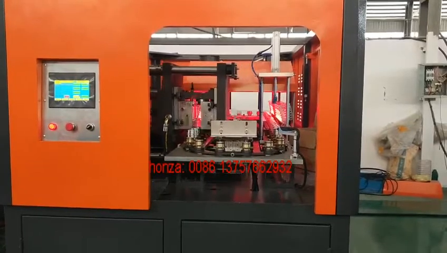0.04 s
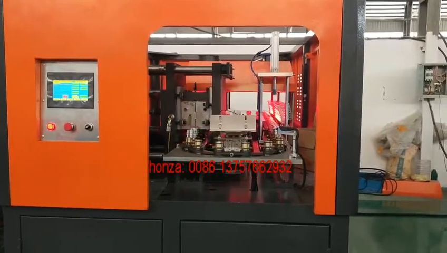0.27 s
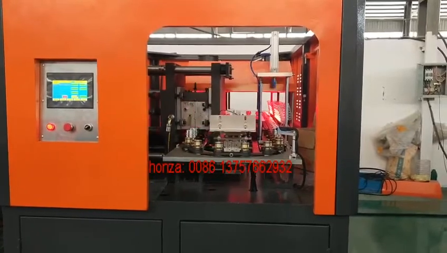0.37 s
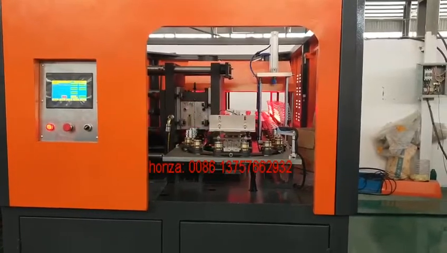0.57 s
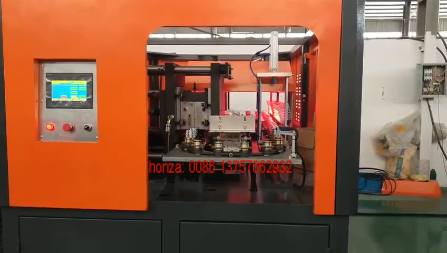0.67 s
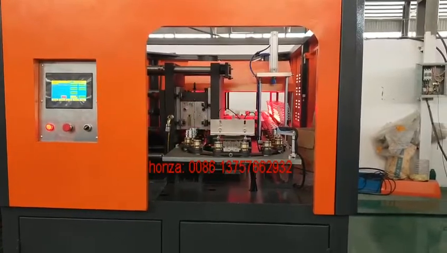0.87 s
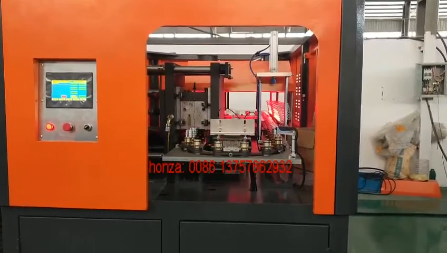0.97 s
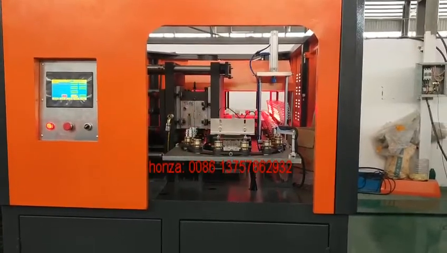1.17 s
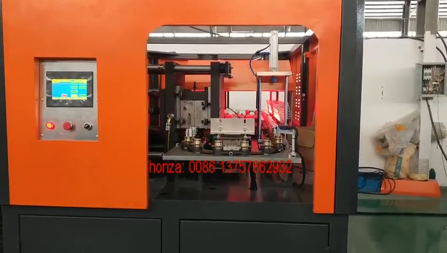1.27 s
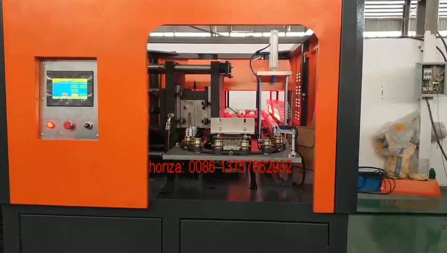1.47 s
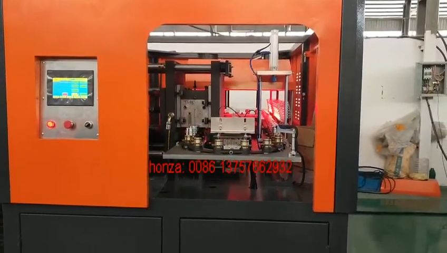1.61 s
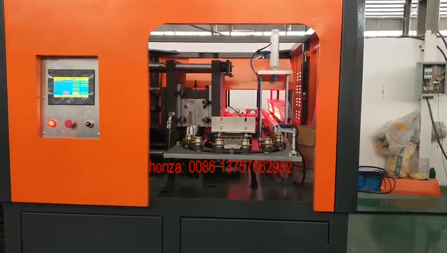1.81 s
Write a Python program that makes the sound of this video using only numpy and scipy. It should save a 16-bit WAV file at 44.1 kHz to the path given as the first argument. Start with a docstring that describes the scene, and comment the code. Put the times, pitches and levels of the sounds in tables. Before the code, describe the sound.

A bottle moulding machine vents overlapping bursts of compressed air while its carriage rumbles; the mould shuts with a boomy thump, then a loud bouncing steel clunk rings out. Humming workshop, close stereo microphone before the open cabinet.

```python
"""A bottle blow-moulding machine goes through one stroke, heard at two microphone ports before its open cabinet.
The workshop hums and roars throughout, as filtered noise and wavering sines. Air valves already hiss at the
start, in overlapping bursts of noise, and the carriage rumbles, strongest near 0.3 s. The mould shuts near
0.49 s: a noise thump and booming panel modes. Low noise puffs of draught begin near 0.8 s; at 0.95 s a cylinder
hits its steel stop and bounces, cracks of noise over damped modes, and the clunk and hiss die away in the hall."""
import sys
import numpy as np
from scipy import signal
from scipy.fft import rfft, irfft
from scipy.io import wavfile
from scipy.ndimage import uniform_filter1d

SR = 44100
rng = np.random.default_rng(int(sys.argv[2]) if len(sys.argv) > 2 else 0)


def log_audio(samples):
    """Write samples as a 16-bit WAV file to the path given in sys.argv[1]."""
    # one column per channel
    frames = np.atleast_2d(samples).T
    # limit to full scale, then quantise
    limited = np.clip(frames, -1, 1)
    pcm = np.round(limited * 32767).astype(np.int16)
    wavfile.write(sys.argv[1], SR, pcm)


N = 81585  # length in samples, 1.85 s


def amp(db):
    """Decibels to gain."""
    return 10 ** (np.asarray(db) / 20)


def times():
    """The time of each sample, in seconds."""
    return np.arange(N) / SR


def colour(points, tilt_db=0):
    """Gain per frequency bin from (freq_hz, gain_db) points, tilted in dB per octave above 128 Hz."""
    octave = np.log2(np.maximum(np.arange(N // 2 + 1) * SR / N, 1))
    freq_hz, gain_db = np.array(points).T
    curve_db = np.interp(octave, np.log2(freq_hz), gain_db)
    return amp(curve_db + tilt_db * np.maximum(octave, np.log2(128)))


PORT_SPACING_M, PORT_MISMATCH = 0.13, 0.084  # mismatch: share of likeness lost even in the bass


def diffuse(points, tilt_db=0):
    """Coloured stereo noise of rms 1 from all sides: the ports hear nearly the same only in the bass."""
    freq_hz = np.arange(N // 2 + 1) * SR / N
    # a diffuse field's likeness falls as a sinc of spacing over wavelength (343 m/s)
    alike = (1 - PORT_MISMATCH) * np.sinc(2 * freq_hz * PORT_SPACING_M / 343)
    mid, side = rfft(rng.standard_normal((2, N)))
    mid = mid * np.sqrt(1 + alike)
    side = side * np.sqrt(1 - alike)
    noise = irfft(np.array([mid + side, mid - side]) * colour(points, tilt_db), N)
    return noise / noise.std()


def walk(rate_hz):
    """Smooth random drift with a spread of 1: white noise averaged twice over 1 / rate_hz."""
    size = max(int(SR / rate_hz), 1)
    drift = rng.standard_normal(N)
    for _ in range(2):
        drift = uniform_filter1d(drift, size, mode="wrap")
    return drift / drift.std()


def envelope(start_s, rise_s, hold_s, t60_s):
    """Linear rise, hold, then an exponential fall of 60 dB per t60_s."""
    age = times() - start_s
    rise = np.clip(age / max(rise_s, 1 / SR), 0, 1)
    return rise * np.exp(-np.log(1000) * np.maximum(age - rise_s - hold_s, 0) / t60_s)


def ring(start_s, modes, rise_s):
    """Damped sine modes set going by one blow."""
    age = times() - start_s
    return sum(amp(level_db) * envelope(start_s, rise_s, 0, t60_s) * np.sin(2 * np.pi * pitch_hz * age)
               for pitch_hz, level_db, t60_s in modes)


def reverb(dry_sound, t60_s, points):
    """Dense reflections as decaying coloured noise, scaled to unit mean energy per port."""
    response = envelope(0, 0.0013, 0, t60_s) * diffuse(points)
    response = response / np.sqrt(np.sum(response ** 2) / 2)
    return signal.fftconvolve(dry_sound, response, axes=1)[:, :N]


# colour of the workshop roar: freq_hz, gain_db
ROAR_COLOUR = [(15, -14.5), (35, 9.5), (60, 3.5), (130, -5), (240, -0.5), (320, -2.5), (385, -4.5),
               (450, -8.5), (700, -13.5), (1000, -14), (1220, -20), (1450, -13.5), (2300, -10), (4000, -14),
               (5800, -13), (8000, -19.5), (16000, -35.5)]
# humming lines of the workshop: pitch_hz (centre), level_db (rms)
HUM_LINES = [(199, -58.5), (298, -59), (381, -52.5), (673, -63)]
ROAR_DB, ROAR_FADE_DB_PER_S = -39.5, 3.5  # level at mid-scene, and how fast it eases
HUM_WANDER, HUM_WANDER_HZ = 0.0094, 15.2  # pitch spread as a fraction, and its averaging rate


def workshop():
    """Fans and motors: a broadband roar that eases steadily, with a few lines of wavering pitch."""
    hum = 0
    for pitch_hz, level_db in HUM_LINES:
        wavering_hz = pitch_hz * (1 + HUM_WANDER * walk(HUM_WANDER_HZ))
        hum = hum + amp(level_db) * np.sqrt(2) * np.sin(2 * np.pi * np.cumsum(wavering_hz) / SR)
    roar_db = ROAR_DB - ROAR_FADE_DB_PER_S * (times() - times().mean())
    return hum + amp(roar_db) * diffuse(ROAR_COLOUR)


# puffs of air over the ports: start_s, length_s, level_db (louder port), left_minus_right_db
DRAUGHT_PUFFS = [(0.804, 0.071, -22, -33), (0.89, 0.042, -18.5, -27), (1.002, 0.17, -30, -13),
                 (1.588, 0.094, -34, 16), (1.779, 0.079, -34, -21.5)]
# colour of the puffs: freq_hz, gain_db
DRAUGHT_COLOUR = [(12, -2.5), (28, 5), (60, -9), (140, -9.5), (260, -17.5), (600, -28), (3000, -70)]


def draughts():
    """Moving air brushes the ports: soft low noise puffs, each mostly on one side."""
    puffs = 0
    for start_s, length_s, level_db, left_minus_right_db in DRAUGHT_PUFFS:
        swell = np.sin(np.pi * np.clip((times() - start_s) / length_s, 0, 1))
        # only the quieter port is turned down
        port_db = level_db + np.minimum([[left_minus_right_db], [-left_minus_right_db]], 0)
        puffs = puffs + amp(port_db) * swell * diffuse(DRAUGHT_COLOUR)
    return puffs


# loudness of the moving carriage: time_s, level_db
CARRIAGE_LEVEL = [(0, -49), (.07, -44.5), (.12, -54.5), (.195, -42), (.235, -36), (.293, -29), (.33, -37),
                  (.39, -35.5), (.47, -33), (.62, -37), (.72, -43.5), (.85, -38.5), (1.0, -41.5),
                  (1.2, -52)]
# colour of its rumble: freq_hz, gain_db
RUMBLE_COLOUR = [(20, -21), (55, -0.5), (120, -2.5), (180, -4), (290, -1), (420, -13), (680, -9),
                 (950, -18), (2500, -30), (16000, -50)]


def carriage():
    """The carriage rumbles on its guides: low noise that follows a drawn level curve."""
    time_s, level_db = np.array(CARRIAGE_LEVEL).T
    return amp(np.interp(times(), time_s, level_db)) * diffuse(RUMBLE_COLOUR)


# venting valves: start_s, rise_s, hold_s, level_db, t60_s (before the common fade), tilt_db_per_octave
VALVE_VENTS = [(-.05, .02, .05, -36, 0.93, 4.5), (0.075, 0.024, 0.2, -34, .8, 0),
               (0.229, 0.017, 0.15, -28.5, 0.59, 2), (0.302, 0.021, 0.055, -19.5, 0.54, -1),
               (0.444, 0.026, 0.031, -21.5, 1.68, 0.9), (0.728, 0.0077, 0.016, -26, 0.7, 1.46),
               (0.935, 0.0072, 0.0069, -24, 0.19, 1.5)]
# colour of the air jets, and of their cabinet reflections: freq_hz, gain_db
AIR_COLOUR = [(100, -16), (250, -13.5), (370, -1), (460, -5), (560, 2.5), (750, -4.5), (1000, -5),
              (1350, -1.5), (2300, 0.5), (3100, -2.5), (4300, 1.5), (7000, 2), (16000, -4)]
# colour of the hiss lingering in the hall: freq_hz, gain_db
LINGER_COLOUR = [(100, -3.5), (5000, 1.5), (9000, 2.5), (16000, -11)]
AIR_ROUGH_DB, AIR_FLUTTER_DB = -0.5, 0.3  # spread of the fast crackle and the slower flutter
VALVES_SHUT_S, SHUT_T60_S = 0.99, 0.45  # all vents fade together from here
WALL_LAG_S, WALL_DB = 0.002295, -17.5  # the cabinet wall mirrors the jets
CABINET_DB, CABINET_T60_S = -3.5, 0.047
LINGER_DB, LINGER_T60_S = -8.5, 1


def vents():
    """Each valve blows and dies away as its line empties; the jet crackles, and cabinet and hall reflect it."""
    air = 0
    for start_s, rise_s, hold_s, level_db, t60_s, tilt_db in VALVE_VENTS:
        air = air + amp(level_db) * envelope(start_s, rise_s, hold_s, t60_s) * diffuse(AIR_COLOUR, tilt_db)
    crackle = amp(AIR_ROUGH_DB * walk(1500) + AIR_FLUTTER_DB * walk(70))
    air = air * crackle * envelope(0, 0, VALVES_SHUT_S, SHUT_T60_S)
    mirrored = np.array([np.interp(times() - WALL_LAG_S, times(), port) for port in air])
    air = air + amp(WALL_DB) * mirrored
    cabinet = amp(CABINET_DB) * reverb(air, CABINET_T60_S, AIR_COLOUR)
    hall = amp(LINGER_DB) * reverb(air, LINGER_T60_S, LINGER_COLOUR)
    return air + cabinet + hall


# dull blows of mould and linkage: start_s, level_db, t60_s, tilt_db_per_octave
MOULD_KNOCKS = [(0.041, -33.5, 0.23, 2), (0.079, -42.5, 0.033, -9.5), (0.489, -16.5, 0.31, 0),
                (0.552, -29.5, 0.34, -2), (0.743, -34.5, 0.16, -2), (0.948, -32, 0.42, -2)]
# colour of the blows: freq_hz, gain_db
KNOCK_COLOUR = [(40, -7.5), (130, -16), (200, 5), (420, 2), (650, -2.5), (850, -3.5), (1130, -5.5),
                (1400, -8), (2200, -9.5), (5000, -14), (16000, -49)]
# lurches of the frame: start_s, pitch_hz, level_db, t60_s
FRAME_JOLTS = [(.082, 79, -35, 0.14), (0.231, 112, -26.5, 0.32), (0.301, 51.4, -19, .13),
               (0.945, 81, -19.5, .13), (0.99, 60.6, -24, 0.045)]
# booming modes of the panels: pitch_hz, level_db, t60_s
PANEL_MODES = [(194, -22.5, 0.049), (226, -48, 0.34), (270, -26.5, 0.78), (323.7, -29, 1),
               (428, -23.5, 0.11), (1055, -23, 0.073), (1210, -27, 0.16)]
MOULD_SHUTS_S, KNOCK_RISE_S = 0.491, 0.0051


def mould():
    """Dull blows of decaying noise; the mould shutting sets the panels booming, and the frame lurches."""
    knocks = 0
    for start_s, level_db, t60_s, tilt_db in MOULD_KNOCKS:
        blow = envelope(start_s, KNOCK_RISE_S, 0, t60_s) * diffuse(KNOCK_COLOUR, tilt_db)
        knocks = knocks + amp(level_db) * blow
    jolts = sum(ring(start_s, [(pitch_hz, level_db, t60_s)], KNOCK_RISE_S)
                for start_s, pitch_hz, level_db, t60_s in FRAME_JOLTS)
    panels = ring(MOULD_SHUTS_S, PANEL_MODES, KNOCK_RISE_S)
    return knocks + jolts + panels


# the cylinder hits its stop and bounces: start_s, level_db (of the ring; the crack scales it)
STOP_STRIKES = [(.9505, -10.5), (.9572, 1), (.9685, -24), (.9738, -4), (0.9837, -11), (.9968, -8.5)]
# brief ring of the stop at every contact: pitch_hz, level_db (added to the strike's), t60_s
STOP_MODES = [(969, -5, 0.028)]
# long modes of the stop, set going by the hardest contact: pitch_hz, level_db, t60_s
STOP_TAIL_MODES = [(900, -42, 0.39), (920, -19, 0.33), (947, -29, 0.18), (1064, -36, .22),
                   (1056, -44, 0.19), (1170, -29, 0.19), (1114, -21, 0.26), (1700, -53, .34),
                   (2000, -44, 0.26)]
# colour of the contact crack: freq_hz, gain_db
CRACK_COLOUR = [(300, 6), (1500, -2), (2000, -22), (4000, -15), (6000, 15.5), (9000, -7), (16000, -5)]
# colour of the clunk's echo in cabinet and hall: freq_hz, gain_db
ECHO_COLOUR = [(300, -42), (700, -19), (820, -20), (890, 1.5), (980, -5), (1120, -7.5), (1220, -22),
               (1650, -21), (1850, -8), (2200, -20), (3800, -17), (9000, -21.5), (16000, -47)]
STOP_RISE_S, STOP_LAG_S, STOP_PAN_DB = 0.0019, 0.00029, 1  # right port later and softer
CRACK_DB, CRACK_T60_S = -13.5, 0.023
CRACK_HARDNESS = 1.17  # harder contacts crack out of proportion: multiplies the strike's dB
ECHO_DB, ECHO_T60_S, ECHO_RISE_S = -21.5, 0.26, 0.002
HALL_DB, HALL_T60_S = -28.5, 1


def stop_ring(hardest_s, lag_s):
    """The steel stop at one port: a brief ring per contact and long modes from the hardest one."""
    brief = sum(amp(level_db) * ring(start_s + lag_s, STOP_MODES, STOP_RISE_S)
                for start_s, level_db in STOP_STRIKES)
    return brief + ring(hardest_s + lag_s, STOP_TAIL_MODES, STOP_RISE_S)


def clunk():
    """Every contact cracks and rings the steel stop, left of centre; cabinet and hall carry it on."""
    hardest_s = max(STOP_STRIKES, key=lambda strike: strike[1])[0]
    metal = np.array([stop_ring(hardest_s, 0), stop_ring(hardest_s, STOP_LAG_S)])
    metal = metal * amp([[STOP_PAN_DB / 2], [-STOP_PAN_DB / 2]])
    contact = sum(amp(CRACK_HARDNESS * level_db) * envelope(start_s, 1 / SR, 0, CRACK_T60_S)
                  for start_s, level_db in STOP_STRIKES)
    crack = amp(CRACK_DB) * contact * diffuse(CRACK_COLOUR)
    cabinet_tail = amp(ECHO_DB) * envelope(hardest_s, ECHO_RISE_S, 0, ECHO_T60_S)
    hall_tail = amp(HALL_DB) * envelope(hardest_s, ECHO_RISE_S, 0, HALL_T60_S)
    echo = (cabinet_tail + hall_tail) * diffuse(ECHO_COLOUR)
    return metal + crack + echo


def scene():
    """The machine in its workshop, from the background to the clunk."""
    return workshop() + draughts() + carriage() + vents() + mould() + clunk()


# colour of the left microphone port: freq_hz, gain_db
LEFT_PORT_COLOUR = [(80, -0.8), (300, 1), (1400, 4), (2400, 2), (3600, 2.5), (4300, -2), (5600, 1.5),
                    (6700, -1), (7600, -12), (9500, -10), (11300, -13), (12200, 1), (13500, 1.5),
                    (15500, -11)]
# colour of the right microphone port: freq_hz, gain_db
RIGHT_PORT_COLOUR = [(80, -2.5), (300, -1.03), (1400, 3), (2400, -2), (3600, -1), (4150, -23.5), (4550, -5),
                     (5200, -4.5), (7100, 5), (8200, -0.5), (9400, -11), (11500, -10), (13500, -12),
                     (15500, -17)]
CEILING, KNEE = 0.84, 4  # peaks bend towards this amplitude; a higher knee bends later
TOP_HZ = 15700


def record(dry):
    """Each port colours the sound in its own way; the highest peaks are rounded and the top is cut off."""
    heard = irfft(rfft(dry) * np.array([colour(LEFT_PORT_COLOUR), colour(RIGHT_PORT_COLOUR)]), N)
    heard = heard / (1 + np.abs(heard / CEILING) ** KNEE) ** (1 / KNEE)
    # steep low-pass: 0.2 dB ripple, 100 dB down beyond the edge
    low_pass = signal.ellip(10, 0.2, 100, TOP_HZ, fs=SR, output="sos")
    return signal.sosfilt(low_pass, heard)


dry = scene()
out = record(dry)
log_audio(out)
```